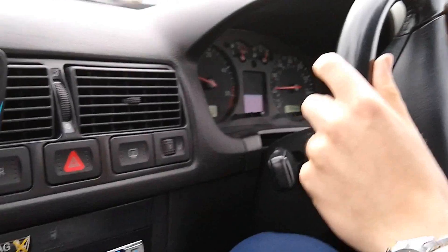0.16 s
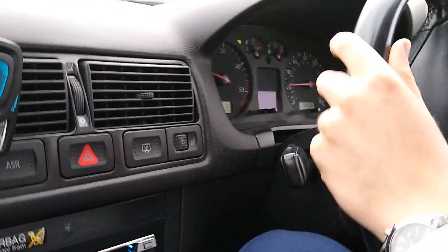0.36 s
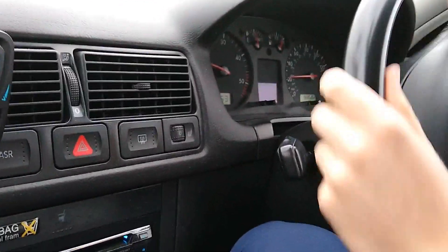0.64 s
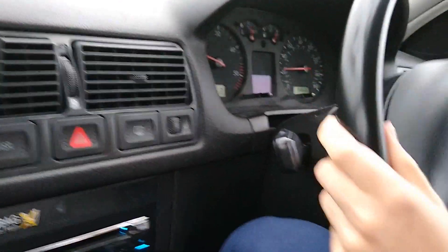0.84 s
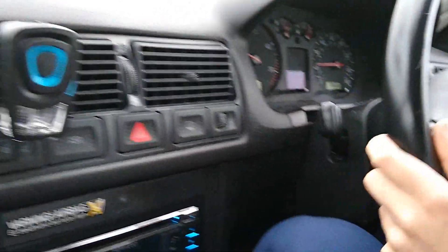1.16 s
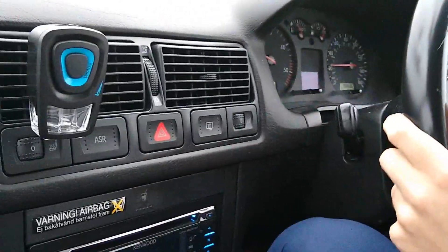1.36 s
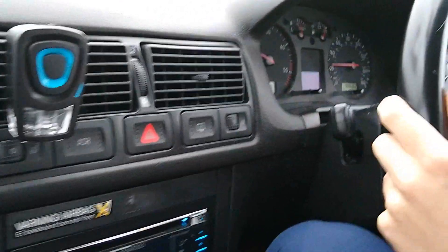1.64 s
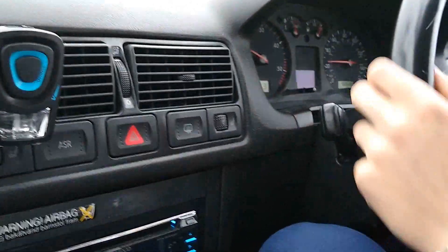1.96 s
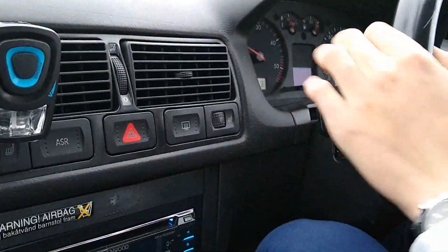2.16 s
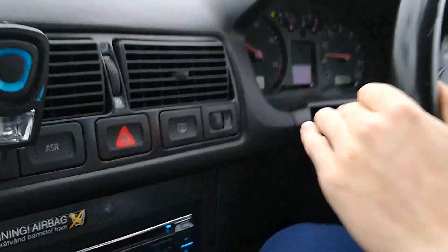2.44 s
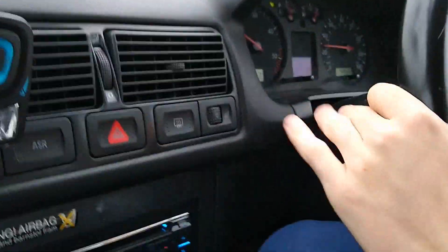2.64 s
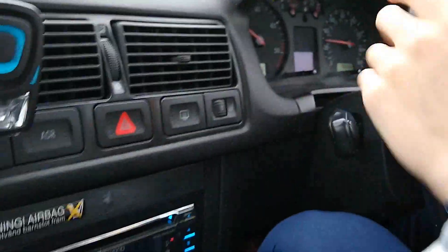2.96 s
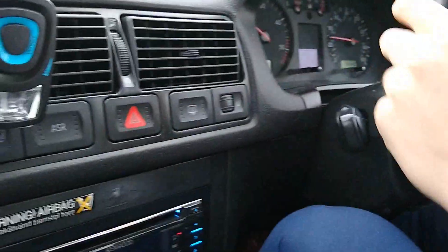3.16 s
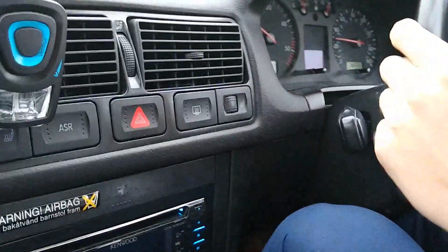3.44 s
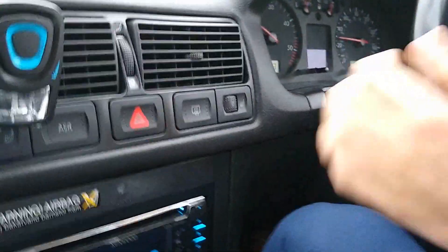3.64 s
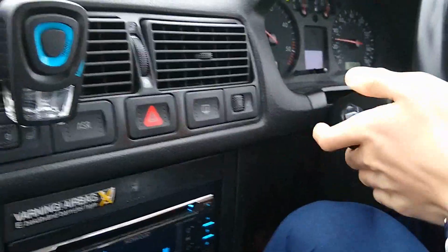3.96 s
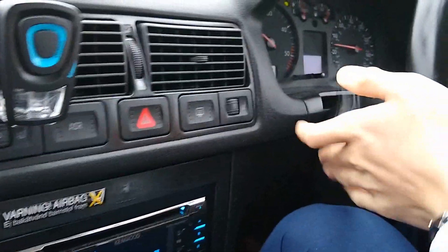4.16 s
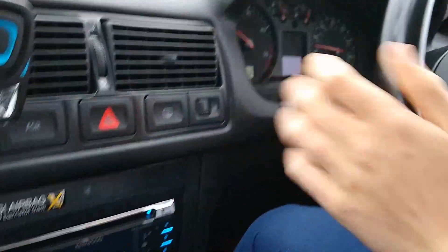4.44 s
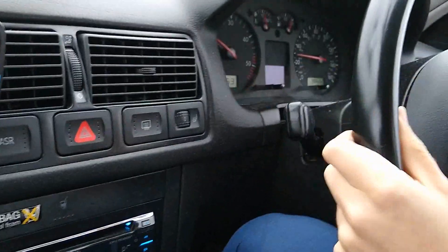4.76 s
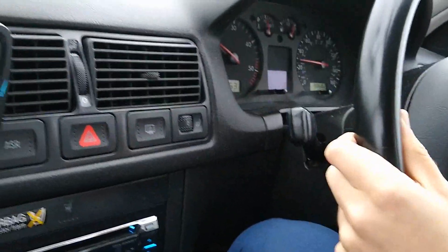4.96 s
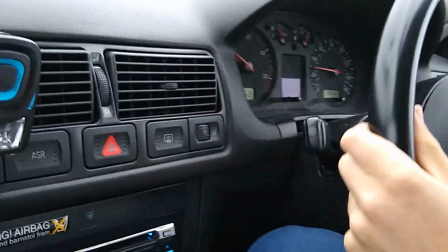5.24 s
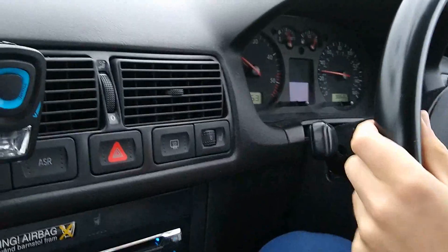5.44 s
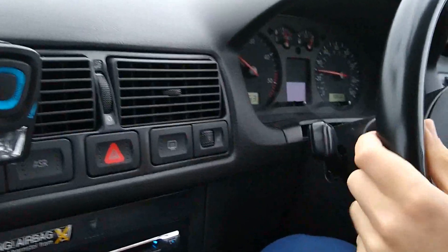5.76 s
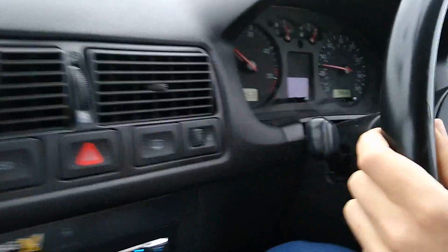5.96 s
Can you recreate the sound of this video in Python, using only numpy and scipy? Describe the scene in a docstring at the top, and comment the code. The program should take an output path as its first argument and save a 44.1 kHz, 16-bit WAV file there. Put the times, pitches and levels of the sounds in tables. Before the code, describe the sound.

An indicator relay clicks sharply behind a car dashboard, sometimes slow, sometimes quicker, with short pauses. Its lever snaps back twice with a hard plastic clack and accelerating bounces, the first with a tiny metallic ping. A hand brushes the wheel and panels creak dully. Beneath lie a deep engine drone, muffled tyre roar and very faint air hiss, heard close up in a dry, enclosed cabin.

```python
"""Inside a small car pulling gently through a bend, the indicator relay ticks and tocks behind the dashboard.
The driver works the stalk, which snaps back to rest twice; a hand and sleeve slide over the wheel.
Relay, stalk shell and spring are ringing tones set off by blows; knocks, creaks and taps are bursts of noise.
The engine is three wavering sine tones; tyres, passing air and sleeve are coloured noise."""
import sys
import numpy as np
from scipy import signal
from scipy.fft import rfft, irfft, next_fast_len
from scipy.io import wavfile
from scipy.ndimage import uniform_filter1d

SR = 44100
rng = np.random.default_rng(int(sys.argv[2]) if len(sys.argv) > 2 else 0)


def persist_wave(psi):
    """Save psi, clipped to +-1, as 16-bit WAV."""
    counts = np.round(np.clip(psi, -1, 1) * 32767).astype(np.int16)
    wavfile.write(sys.argv[1], SR, np.atleast_2d(counts).T)


N = 268613
TIME = np.arange(N) / SR
RING = np.arange(SR // 4) / SR  # time axis of one short sound, in s

# the relay pulls in: t/s, relative level/dB, treble tilt/(dB per octave)
TICKS = [(.2908, 0.5, 10.5), (.9846, 1.5, 9), (1.2681, 1.5, 4), (1.5465, 2, 3), (2.4525, 1, 6),
         (3.3035, 1.5, 1.5), (3.9979, 1, 4.5), (4.5387, 0.5, 5), (4.8226, -0.5, 6.5), (5.154, 0, 5)]
# the relay lets go: t/s, relative level/dB, treble tilt/(dB per octave)
TOCKS = [(.6588, -1.5, 5), (1.1043, -0.5, 4.5), (1.3859, -1, 3.5), (1.6669, -0.5, 3.5), (2.5682, -8, 3.5),
         (2.9788, -2, 2.5), (3.6722, -2.5, 2.5), (4.6589, -2, 3), (4.943, -2, 3), (5.2969, -1, 3)]
# armature on the core: about f/Hz, relative level/dB, t60/s, left minus right/dB
TICK_MODES = [(1506, -4.5, 0.058, -7), (1920, -9, 0.011, 7), (2506, -1.5, 0.039, -14.5),
              (2650, 4, 0.042, 1), (2883, -3.5, 0.025, -6), (3500, -19, 0.042, -27), (3720, -8, 0.014, -13),
              (4920, -13, 0.013, -22.5), (5740, -14, 0.024, -14), (6480, -11, 0.026, 14),
              (7330, -9.5, 0.027, -4.5), (8600, -19, 0.034, -15), (9070, -37.5, 0.0044, -37),
              (12100, -28, 0.036, -13), (14800, -80, 0.011, -6)]
# armature on its back stop: about f/Hz, relative level/dB, t60/s, left minus right/dB
TOCK_MODES = [(963, 9, 0.067, 2.5), (1523, 5, 0.1, -13.5), (1944, -0.5, 0.017, -8.5), (2550, -9, 0.034, -6),
              (3032, 7, 0.052, -5.5), (4700, -13, 0.017, -13.5), (5520, -20.5, 0.009, -20),
              (6660, -9, 0.027, -8), (7230, -3.5, 0.015, -3), (8800, -26, 0.019, -8),
              (9700, -11, 0.0069, -10.5), (11100, -18, 0.0074, -10), (12350, -19.5, 0.0071, -12),
              (12500, -39, .012, -7), (14700, -34, .005, -6)]
# colour of the first snap of the contacts: f/Hz, relative level/dB
SNAP_COLOUR = [(700, -31), (1600, -19), (2500, 5), (4000, -2.5), (6500, -6), (10000, -19), (16000, -18)]
# colour of the cabin's duller wash: f/Hz, relative level/dB
WASH_COLOUR = [(600, -2.5), (1500, -5.5), (2600, 2.5), (3800, -5), (4600, -10), (9000, -11.5), (16000, -51)]


def relay(blows, modes, db, near_t60, direct, snap_db, travel_s, chatter_db, wash_db, wash_t60, vary_db, drift_db):
    """Each blow rings the same relay, heard through dashboard reflections and a short wash of the cabin."""
    chatter_colour = [(600, -5.0), (1400, -9.5), (2400, -6.0), (5000, -6), (11000, -2.0), (16000, -20)]
    usual_path = scatter(decay(near_t60), direct)
    drift = undb(drift_db)
    out = np.zeros((2, N))
    for s, blow_db, tilt_db in blows:
        level = undb(db + blow_db)
        # part of the reflections is new at each blow
        path = (usual_path + drift * scatter(decay(near_t60))) / np.hypot(1, drift)
        # the contacts snap just before the armature lands; loose parts chatter
        snap = undb(snap_db) * colour(scatter(decay(.005), 1), SNAP_COLOUR)
        chatter = undb(chatter_db) * colour(scatter(decay(0.035)), chatter_colour)
        # upholstery soaks up the top of what comes back
        wash = undb(wash_db) * colour(scatter(decay(wash_t60)), WASH_COLOUR)
        add(out, s, level * ((snap + chatter) * pan(-5.5) + wash * pan(-5.0)))
        armature = signal.fftconvolve(ring(modes, tilt_db, vary_db), path, axes=1)
        add(out, s + travel_s, level * armature)
    return out


# the stalk springs back: t/s, swing to the stop/s, first flight back/s, relative level/dB,
# treble tilt/(dB per octave)
RETURNS = [(1.005, 0.01, .027, 3, 4.5), (4.2536, .0095, .031, 2, 1.5)]
# single knocks of the stalk: t/s, relative level/dB, t60/s, treble tilt/(dB per octave)
KNOCKS = [(1.149, -19.5, 0.075, -1.5), (2.175, -19, 0.05, -3), (2.568, -2, 0.048, 4),
          (2.572, -7.5, 0.042, -1.5), (3.6868, -19, 0.015, -8.5), (4.161, -26, .06, 1),
          (4.401, -21.5, 0.11, .5), (5.35, -21.5, 0.042, 2)]
# colour of the lever and column shell: f/Hz, relative level/dB
PLASTIC_COLOUR = [(40, -13), (100, -4), (300, -5.5), (700, 0), (1100, -3), (2100, -9), (3000, -2),
                  (4300, -8), (6000, -8), (8500, -8.5), (11000, -7.5), (15000, -19), (16000, -35)]
# lever and column shell ringing: about f/Hz, relative level/dB, t60/s, left minus right/dB
STALK_MODES = [(1517, -8, 0.078, -2), (2590, -9, 0.073, 7), (3060, 4.5, 0.081, 8), (3390, -7, 0.065, 10),
               (7450, -1, .03, 20), (9500, -11, .03, 0), (10600, -6, .03, 0)]


def stalk(db, direct, tail_db, tail_t60, pan_db, rattle_db, shell_db):
    """The sprung lever hits its stops and rattles out unevenly, ringing the shell; tilt sets its brightness."""
    out = np.zeros((2, N))
    contacts = [contact for row in RETURNS for contact in spring_back(*row, count=6)]
    for s, knock_db, t60, tilt_db in contacts + KNOCKS:
        unevenness = unit(uniform_filter1d(rng.standard_normal(len(RING)), size=30))
        fade = decay(t60) + undb(tail_db) * decay(tail_t60)
        envelope = undb(rattle_db * unevenness) * fade
        knock = colour(scatter(envelope, direct), tilted(PLASTIC_COLOUR, tilt_db))
        add(out, s, undb(db + knock_db) * knock)
    out += undb(shell_db) * signal.fftconvolve(out, ring(STALK_MODES), axes=1)[:, :N]
    # the left side has less treble
    left = colour(out[0], [(700, 2.0), (3000, -3.5), (10000, -5.0)])
    return np.array([left, out[1]]) * pan(pan_db)


RELEASE_DB, SEAT_DB = -7, -0.5  # leaving the detent; seating in the middle notch
SEAT_SHARE = .33  # the lever seats this far through the first flight
CONTACT_T60_S, SEAT_T60_S = 0.059, .04
BOUNCE_S, BOUNCE_KEEP = .022, .79  # first gap after the flight; each gap is this share of the last
BOUNCE_DB, BOUNCE_TILT_DB = -4, -0.4  # each bounce is weaker and duller than the last


def spring_back(s, swing_s, flight_s, db, tilt_db, count):
    """Contacts (t/s, dB, t60/s, tilt): the lever leaves its detent, hits the stop, seats, bounces ever faster."""
    stop = s + swing_s
    release = (s, db + RELEASE_DB, CONTACT_T60_S, tilt_db)
    seat = (stop + SEAT_SHARE * flight_s, db + SEAT_DB, SEAT_T60_S, tilt_db)
    contacts = [release, seat]
    gaps = [flight_s, *(BOUNCE_S * BOUNCE_KEEP ** np.arange(count))]
    for k, gap in enumerate(gaps):
        contacts.append((stop, db + k * BOUNCE_DB, CONTACT_T60_S, tilt_db + k * BOUNCE_TILT_DB))
        stop += gap
    return contacts


# the single ping of the detent spring: t/s, level/dB
PING = (1.0172, 32.4)
# its one mode: about f/Hz, relative level/dB, t60/s, left minus right/dB
SPRING_MODE = [(8680, 0, 0.034, -5)]


def spring_ping():
    """The detent spring rings once as one fading tone."""
    out = np.zeros((2, N))
    s, db = PING
    add(out, s, undb(db) * ring(SPRING_MODE))
    return out


# dull creaks of the trim: t/s, relative level/dB, t60/s, treble tilt/(dB per octave)
CREAKS = [(0.469, 0, .13, 1), (.554, 2, .1, 0), (.735, 1, .09, 0), (.761, -1.5, 0.077, -0.5),
          (1.1496, 3.5, .059, 0), (2.229, -6.5, .09, -4.5), (2.67, -7.5, 0.081, 1), (5.245, -9.5, .04, -2)]


def trim(db):
    """Panels shift with soft, dull creaks, made as fading bursts of noise."""
    out = np.zeros((2, N))
    # f/Hz, relative level/dB
    panel = [(300, -5), (750, 0.5), (1050, 2), (1400, -9.5), (2000, -8.5), (2800, -12.0), (6000, -18), (16000, -23)]
    for s, creak_db, t60, tilt_db in CREAKS:
        creak = colour(scatter(decay(t60)), tilted(panel, tilt_db))
        add(out, s, undb(db + creak_db) * creak)
    return out * pan(-3.3)


# small dry taps close by: t/s, relative level/dB, t60/s
TAPS = [(1.972, -17.5, 0.029), (2.809, -23.5, .03), (3.183, -16, 0.047), (3.688, -4, 0.0012),
        (4.918, -19, 0.023)]


def taps(db):
    """Light touches on plastic, too small to ring: a click and a short burst of noise."""
    out = np.zeros((2, N))
    touch = [(60, 6), (400, -8), (1500, 3), (5000, -1.5), (11000, -0.5), (16000, -12)]
    for s, tap_db, t60 in TAPS:
        add(out, s, undb(db + tap_db) * colour(scatter(decay(t60), .7), touch))
    return out * pan(-7)


# strokes of the hand over the wheel: t/s at the fastest, length/s, relative level/dB
STROKES = [(.06, 0.91, -48), (0.753, 0.58, -35.5), (1.96, 0.31, -47.5), (2.358, 0.39, -53),
           (2.912, 0.24, -51.5), (3.168, 0.099, -46.5), (3.65, .06, -48), (3.86, 0.24, -55),
           (4.513, 0.33, -53.5), (4.688, 0.16, -46), (4.925, 0.075, -45), (5.406, 0.2, -48),
           (5.86, 0.29, -48.5)]
# colour of the rub: f/Hz, relative level/dB
SLEEVE_COLOUR = [(1500, -26), (3000, -13), (5000, -9), (7500, -6), (9500, -0.5), (11000, -0.5), (13000, -7),
                 (16000, -13)]
STROKE_RISE = .38  # share of a stroke spent speeding up
GRIP_DB = -59.5  # the hand's rub between strokes, relative


def sleeve(db, grain_db, pan_db):
    """Skin and cloth hiss over the wheel rim, grainy with tiny slips; strokes swell quickly and ease off."""
    power = undb(GRIP_DB) ** 2
    for s, length, stroke_db in STROKES:
        width = length * np.where(TIME < s, STROKE_RISE, 1 - STROKE_RISE)
        power = power + undb(stroke_db) ** 2 * np.exp(-2 * ((TIME - s) / width) ** 2)
    rub = unit(colour(rng.standard_normal((2, N)), SLEEVE_COLOUR))
    grain = undb(db + grain_db * walk(160))
    return rub * np.sqrt(power) * grain * pan(pan_db)


# the engine picks up, eases off, then pulls again: t/s, firing rate f/Hz, relative level/dB
THROTTLE = [(0, 42.6, -34.5), (.9, 43.3, -25), (1.4, 46.32, -20.5), (2.3, 51.52, -20.5), (2.9, 53.2, -22),
            (3.4, 53, -25), (4.4, 53.54, -24.5), (5.4, 54.43, -21), (6.09, 56.7, -19.5)]


def engine(boom_db, second_db, third_db, wander, throb_db, waver_db):
    """Uneven firings press on the cabin air; only the lowest three harmonics come through, louder with load."""
    hz, boom = curves(THROTTLE)
    phase = 2 * np.pi * np.cumsum(hz) / SR + wander * walk(5.8)
    out = undb(boom_db + throb_db * walk(13)) * np.sin(phase)
    out += undb(second_db + waver_db * walk(5)) * np.sin(2 * phase)
    out += undb(third_db + 2.2 * walk(3.6)) * np.sin(3 * phase)
    return np.sqrt(2) * undb(boom) * out * pan(0.71)


# tyres on the road: t/s, relative rumble level/dB, relative roar level/dB
ROAD_LEVEL = [(0, -30.5, -36.5), (.6, -26, -35), (1.3, -29, -33), (2.7, -26, -32.5), (3.9, -31.5, -35),
              (4.8, -30.5, -33.5), (6.09, -31, -32.5)]
# colour of the low rumble: f/Hz, relative level/dB
RUMBLE_COLOUR = [(20, -45), (32, -9), (45, -6.5), (65, 5.5), (85, 3), (115, 3), (150, -1), (195, -10),
                 (245, -1.5), (290, -3.5), (345, -22), (500, -56.5), (3000, -60)]
# colour of the roar: f/Hz, relative level/dB
ROAR_COLOUR = [(250, -10), (350, -5.5), (415, 3.5), (460, -4), (510, -3.5), (600, -5.5), (720, -9),
               (900, -16), (1250, -22), (1410, -19), (1650, -27.5), (2300, -32.5), (4000, -43.5),
               (12000, -73)]


def tyres(rumble_db, roar_db, flicker_db):
    """Tyres shake the body and roar on the asphalt: two bands of noise that flicker slightly."""
    rumble, roar = curves(ROAD_LEVEL)
    rumble_gain = undb(rumble + rumble_db + flicker_db * walk(14))
    roar_gain = undb(roar + roar_db + flicker_db * walk(14))
    out = cabin_noise(RUMBLE_COLOUR) * rumble_gain * pan(-0.79)
    return out + cabin_noise(ROAR_COLOUR) * roar_gain * pan(-0.68)


# colour of the passing air: f/Hz, relative level/dB
AIR_COLOUR = [(600, -8), (1500, 4), (3100, 4), (4200, -0.5), (7000, 0), (10000, -2), (13000, -8.5),
              (16000, -10)]


def air(db):
    """Air hisses steadily past, as noise of constant level."""
    return cabin_noise(AIR_COLOUR) * undb(db) * pan(-2.4)


def cabin_noise(points):
    """Coloured stereo noise whose two sides differ more at higher pitch."""
    side = [(40, -20.5), (110, -11), (300, -12), (650, -6.5), (1300, 1)]  # f/Hz, side minus middle/dB
    mid, difference = rng.standard_normal((2, N))
    difference = colour(difference, side)
    stereo = np.array([mid + difference, mid - difference])
    return colour(stereo, points) / np.std(colour(mid, points))


def ring(modes, tilt_db=0, vary_db=0):
    """Fading tones after one blow; dB is the height of each resonance, and pitch varies slightly by chance."""
    chance = rng.standard_normal((len(modes), 2))
    out = np.zeros((2, len(RING)))
    for k, (hz, db, t60, pan_db) in enumerate(modes):
        height_db = db + tilt_db * np.log2(hz / 4000) + vary_db * chance[k, 0]
        # a slowly fading tone needs a lower start for the same resonance height
        start = undb(height_db) * 2 * np.log(1000) / (t60 * SR)
        tone = np.sin(2 * np.pi * hz * (1 + 0.0039 * chance[k, 1]) * RING)
        out += (-1) ** k * start * pan(pan_db) * decay(t60) * tone
    return out


def scatter(envelope, direct=0):
    """A direct click (left first) and dense random reflections under an envelope, evened out in colour."""
    echoes = rng.standard_normal((2, len(RING))) * envelope / np.sqrt(np.sum(envelope ** 2))
    echoes[[0, 1], [0, 5]] += direct
    spectrum = rfft(echoes)
    smooth = uniform_filter1d(np.abs(spectrum) ** 2, size=90)
    even = irfft(spectrum / np.sqrt(smooth), len(RING))
    return even * (RING < RING[-1] * .9)  # drop what wraps round to the end


def colour(x, points):
    """Filter with the gains of (f/Hz, dB) points, reacting as early as possible (minimum phase)."""
    n = x.shape[-1]
    size = 2 * next_fast_len(n)
    hz, db = np.transpose(points)
    f = np.maximum(np.arange(size // 2 + 1) * SR / size, 1)
    # folding the cepstrum forward in time keeps the filter from sounding early
    cepstrum = irfft(np.log(undb(np.interp(np.log(f), np.log(hz), db))))
    cepstrum[1:size // 2] *= 2
    cepstrum[size // 2 + 1:] = 0
    return irfft(rfft(x, size) * np.exp(rfft(cepstrum)))[..., :n]


def tilted(points, tilt_db):
    """Tilt a spectrum around 4 kHz; everything below 1 kHz shifts as 1 kHz does."""
    return [(hz, db + tilt_db * np.log2(max(hz, 1000) / 4000)) for hz, db in points]


def walk(rate):
    """Slow chance with a spread near 1: random steps at this rate per second, smoothed twice."""
    k = max(int(SR / rate), 1)
    steps = np.repeat(rng.standard_normal(N // k + 1), k)
    return unit(uniform_filter1d(uniform_filter1d(steps, k), k)[:N])


def decay(t60):
    """An exponential fade that falls 60 dB in t60 seconds."""
    return np.exp(-np.log(1000) * RING / t60)


def curves(table):
    """The columns of a table, joined by straight lines in time."""
    s, *columns = np.transpose(table)
    return [np.interp(TIME, s, c) for c in columns]


def pan(db):
    """Left and right gains for a level difference, left minus right."""
    return undb(np.array([[db], [-db]]) / 2)


def undb(db):
    """Decibels to gain."""
    return 10 ** (np.asarray(db) / 20)


def unit(x):
    """Scale to rms 1."""
    return x / np.sqrt(np.mean(x ** 2))


def add(out, s, sound):
    """Mix a sound in at a time in seconds."""
    i = int(s * SR)
    out[:, i:i + sound.shape[1]] += sound[:, :N - i]


def scene():
    """Relay and stalk over the noise of driving."""
    ticks = relay(TICKS, TICK_MODES, db=17.0, near_t60=0.023, direct=1.2, snap_db=-5.5, travel_s=.0005,
                  chatter_db=-16.5, wash_db=-13.5, wash_t60=0.094, vary_db=2.5, drift_db=-4.5)
    tocks = relay(TOCKS, TOCK_MODES, db=20.0, near_t60=0.019, direct=0.41, snap_db=-14.5, travel_s=.0008,
                  chatter_db=-14.5, wash_db=-22.5, wash_t60=0.16, vary_db=0, drift_db=-5)
    knocks = stalk(db=19.5, direct=0.11, tail_db=-19.5, tail_t60=0.21, pan_db=-2.5, rattle_db=3.0, shell_db=-3)
    knocks += spring_ping() + trim(db=6.5) + taps(db=2.5)
    rub = sleeve(db=-2.5, grain_db=1.5, pan_db=-9.0)
    drive = engine(boom_db=-1.5, second_db=-8.5, third_db=-21, wander=0.13, throb_db=2.5, waver_db=2)
    drive += tyres(rumble_db=5, roar_db=0.5, flicker_db=0.26) + air(db=-58.0)
    return ticks + tocks + knocks + rub + drive


START_S, TOP_HZ = 0.033, 15800


def record(dry):
    """The sound opens from near silence within 4 ms, is clipped at full scale and loses its very top."""
    opened = np.clip((TIME - START_S) / .004, .001, 1)
    low_pass = signal.ellip(10, .2, 80, TOP_HZ, fs=SR, output="sos")
    return signal.sosfilt(low_pass, np.clip(dry * opened, -1, 1))


dry = scene()
out = record(dry)
persist_wave(out)
```